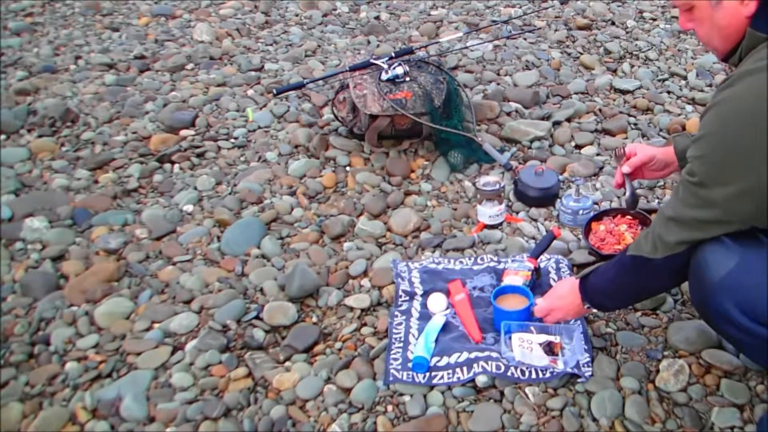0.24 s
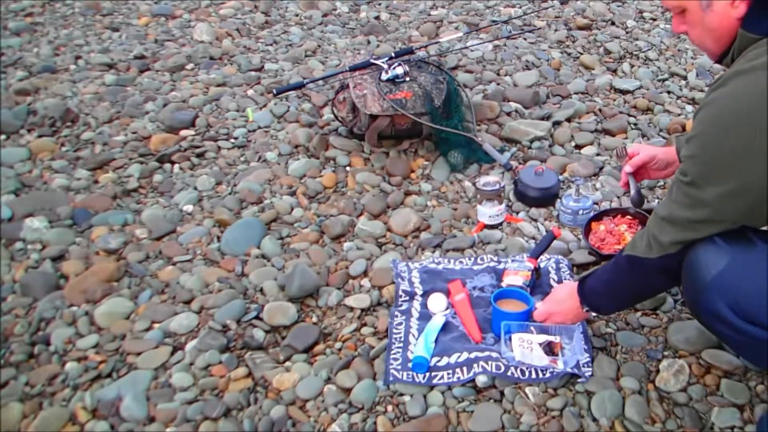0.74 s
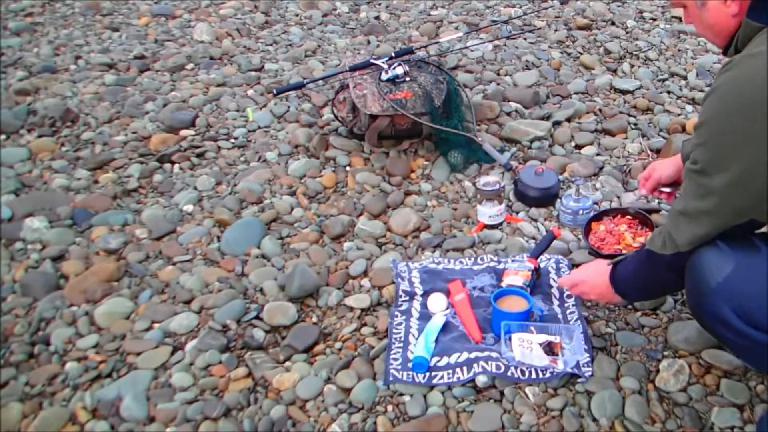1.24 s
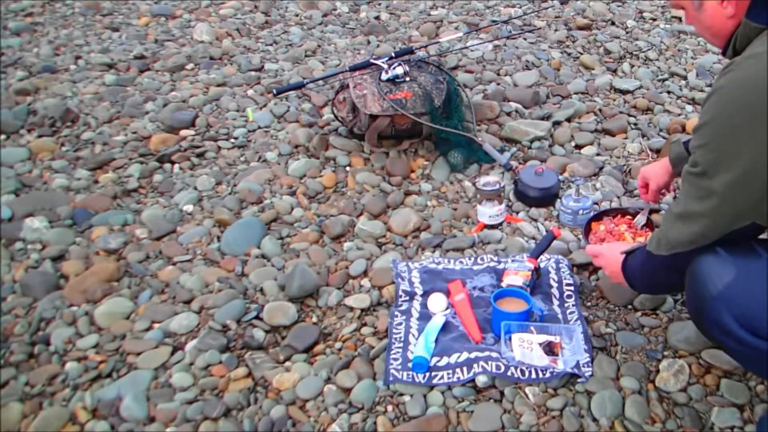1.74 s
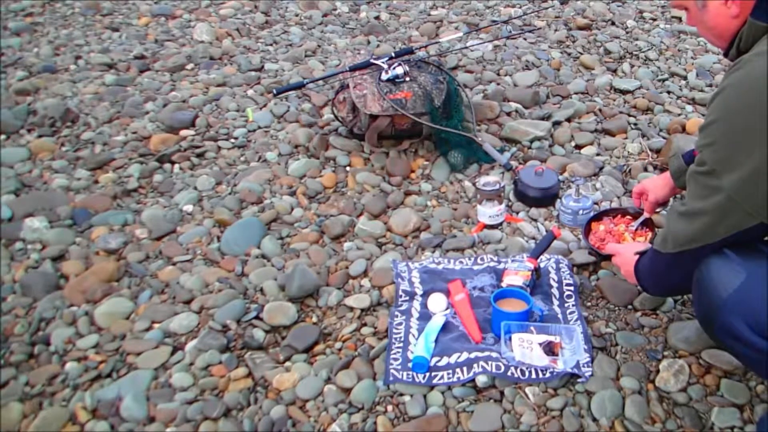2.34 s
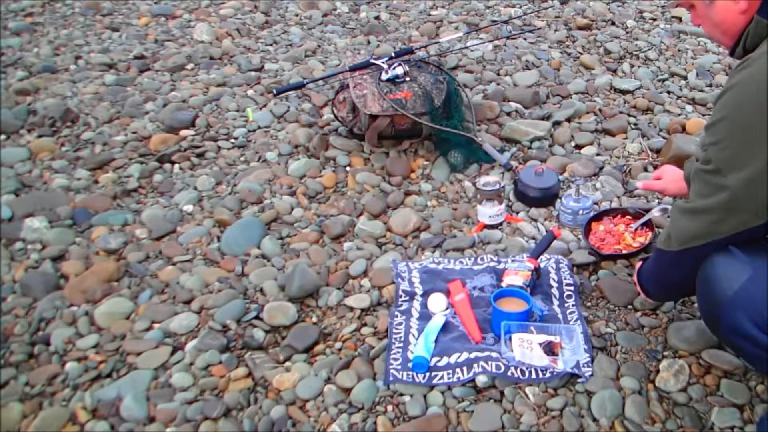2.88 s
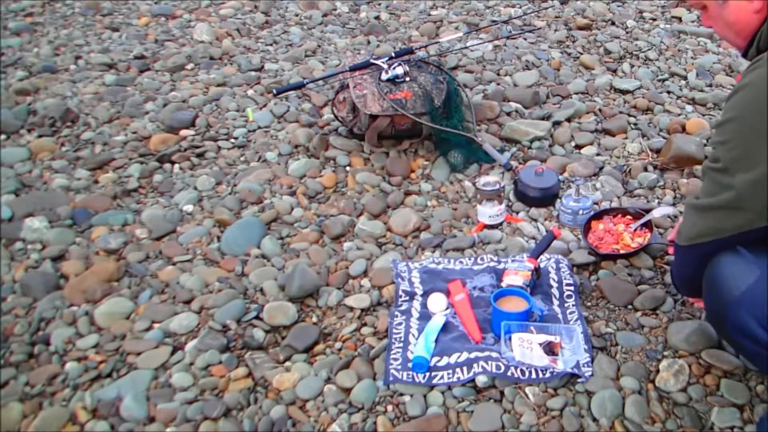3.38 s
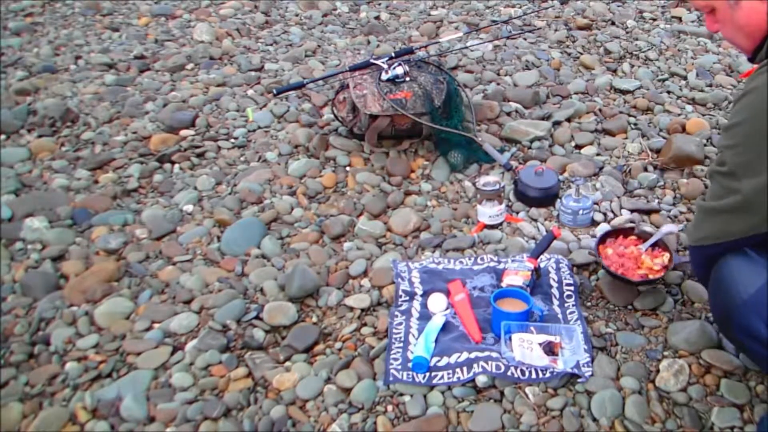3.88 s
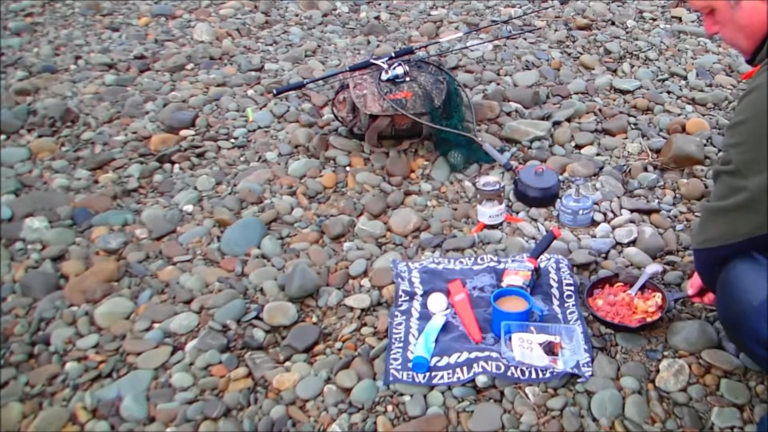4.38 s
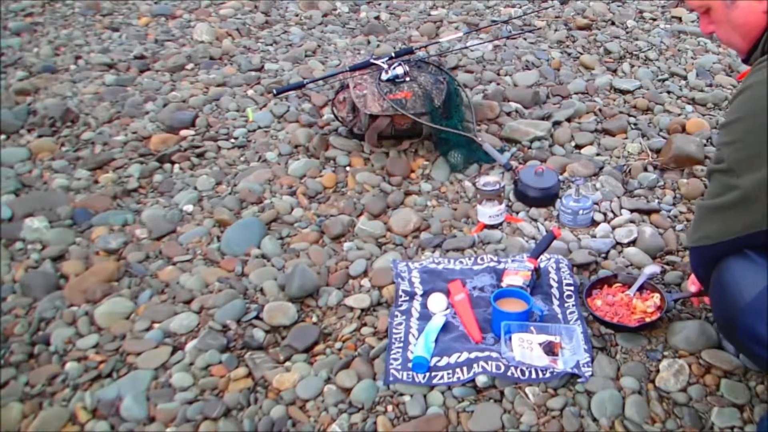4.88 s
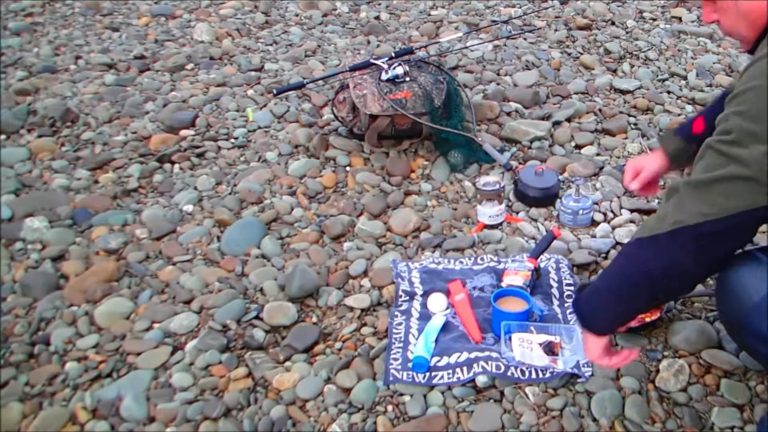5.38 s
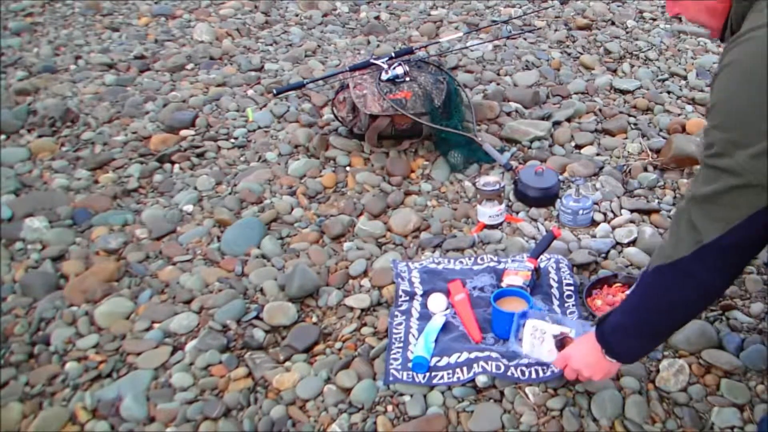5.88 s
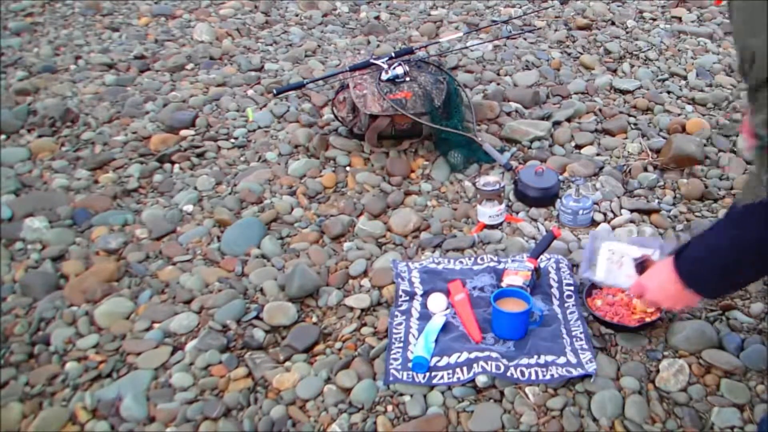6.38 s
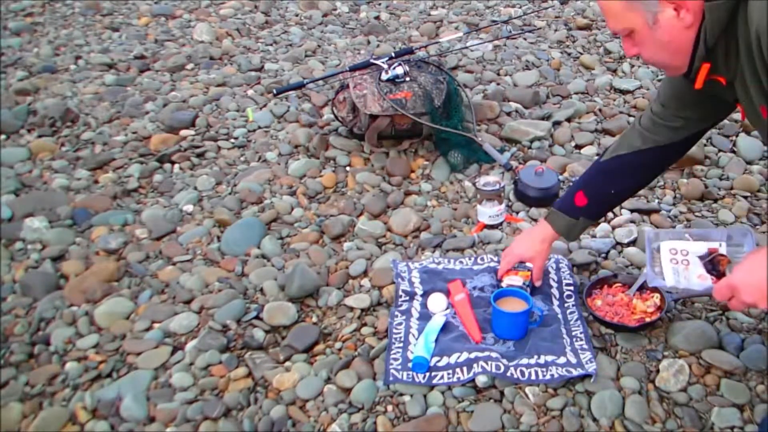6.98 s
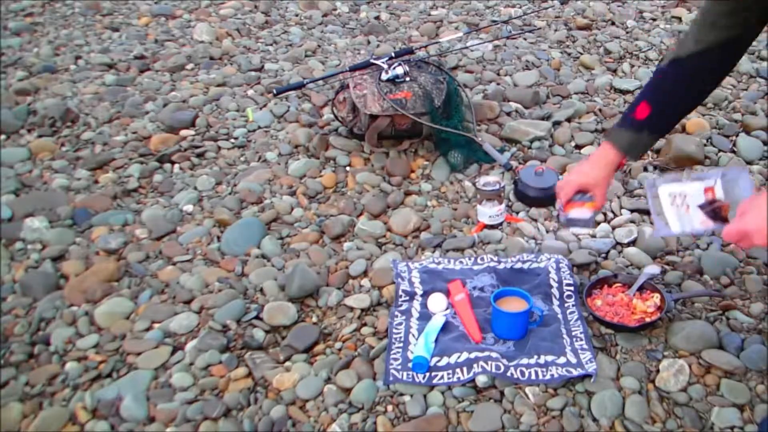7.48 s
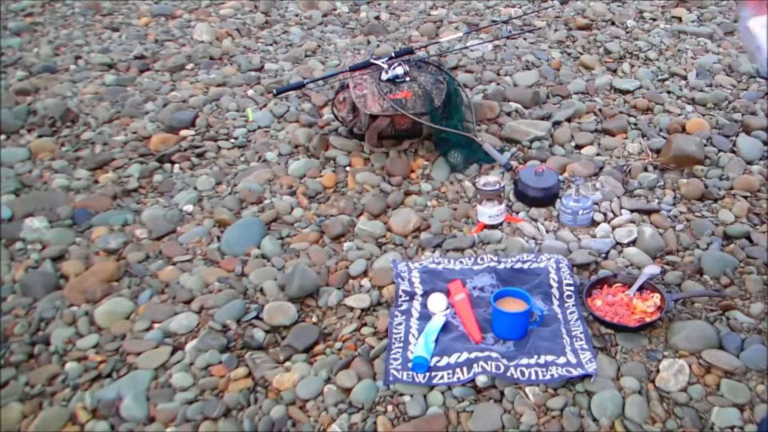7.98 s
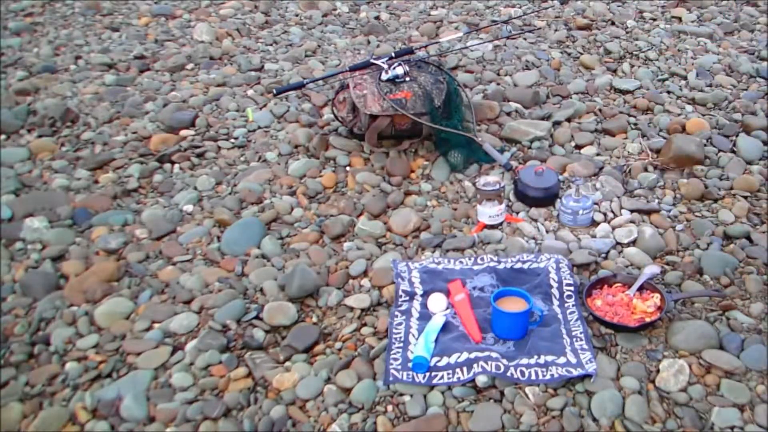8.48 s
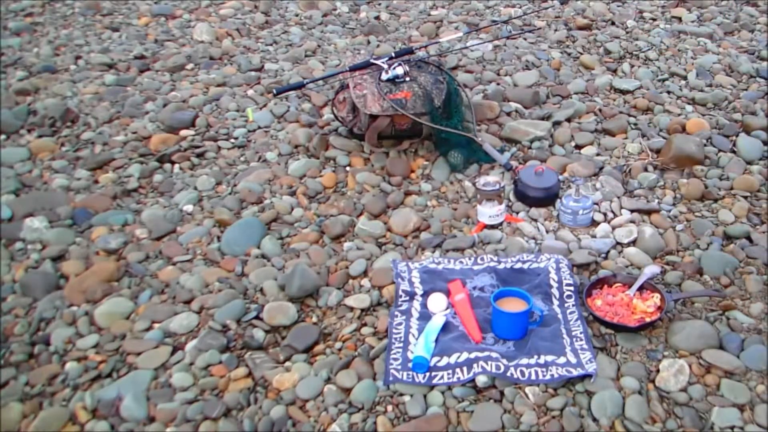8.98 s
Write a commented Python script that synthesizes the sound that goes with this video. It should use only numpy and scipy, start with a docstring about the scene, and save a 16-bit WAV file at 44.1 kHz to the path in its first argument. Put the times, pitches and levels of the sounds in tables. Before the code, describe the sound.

A far river rushes softly behind lively birdsong, heard in the open air through a small stereo microphone touched by light gusts. Two faint, quick spoon scrapes come from a small pan, which later clacks down on the stones. In the second half, clothing and a plastic bag crinkle and drag, joined by crisp pebble clicks that come thickest near the end, as the birds thin out.

```python
"""Camp meal by a river

Birds warble, chip and rasp over the far rush of water: sine glides and chopped noise, echoed off
stones and trees. A spoon scrapes a small pan; the pan is set down on stones; both ring its modes.
Sleeves and a plastic bag rustle in dense creases, pebbles click underfoot. Light wind puffs on
a small stereo microphone whose housing rings near 5 kHz."""
import sys
import numpy as np
from scipy import signal
from scipy.io import wavfile

SR = 44100
rng = np.random.default_rng(int(sys.argv[2]) if len(sys.argv) > 2 else 0)


def unload_audio(sound):
    """Save the sound as a 16-bit wav file, at the path given as the first command line argument."""
    columns = np.transpose(np.atleast_2d(sound))
    # keep every value between -1 and 1, then stretch to whole-number steps
    steps = np.round(np.clip(columns, -1, 1) * 32767)
    wavfile.write(sys.argv[1], SR, steps.astype(np.int16))


N = 407484
T = np.arange(N) / SR

# Table levels are relative: ahead of each source's gain and the microphone.
# river (frequency [Hz], density [dB])
RIVER_SPECTRUM = [(30, -42), (60, -16), (125, -3.5), (500, 4.5), (1000, -0.5), (2000, -5), (3300, -4.5),
                  (5300, -29), (8000, -4.5), (16000, -72)]
# river (frequency [Hz], left-right correlation [0-1])
RIVER_CORRELATION = [(60, 0.97), (300, 0.33), (5000, 0.42)]
# breeze (time [s], level [dB])
BREEZE_LEVEL = [(0, -75), (1.4, -73.5), (1.7, -64.5), (3.2, -66.5), (4, -75.5), (4.7, -63.5), (5.7, -67),
                (7.2, -78)]
# wind puffs (time [s], level [dB])
WIND_PUFFS = [(1.634, -29.5), (1.672, -30.5), (1.702, -39), (2.726, -35.5), (2.802, -39), (2.911, -40),
              (3.109, -38.5), (3.175, -34), (4.64, -34)]
# distant flock (time [s], level [dB])
TWITTER_LEVEL = [(0, -54), (.7, -55.5), (1.2, -55), (1.45, -108), (2.15, -54.5), (3.3, -56), (3.55, -67),
                 (3.9, -58), (4.8, -67.5), (5.3, -51), (5.7, -65)]
# thin swoops that drop and level out (time [s], start [Hz], level [dB])
BIRD_SWOOPS = [(0.208, 5090, -50.5), (0.368, 3620, -54), (.99, 5300, -55), (1.13, 4700, -58),
               (1.19, 4760, -53), (3.825, 5100, -54), (4.04, 4930, -59.5), (5.33, 4750, -54.5),
               (5.278, 5370, -61), (5.475, 5000, -50.5)]
# warbles (time [s], glide in [s], glide out [s], start [Hz], turn [Hz], end [Hz], level [dB])
BIRD_WARBLES = [(.255, 0.044, 0.23, 4760, 3880, 3500, -51), (.52, 0.033, 0.06, 3440, 3640, 2830, -50.5),
                (.76, 0.038, 0.031, 3310, 3760, 3480, -47), (.825, 0.028, 0.073, 3650, 2320, 3580, -54.5),
                (1.02, 0.044, 0.038, 4250, 3500, 2870, -46.5), (1.085, 0.022, 0.092, 3070, 2360, 3220, -50),
                (1.72, 0.036, 0.077, 4130, 3280, 2570, -54), (1.915, 0.038, 0.026, 3490, 3870, 2620, -43.5),
                (2.01, 0.067, 0.015, 2450, 3370, 2460, -47.5),
                (2.21, 0.026, 0.015, 4040, 3480, 3000, -44.5),
                (2.243, 0.03, 0.052, 3230, 2374, 2650, -48.5), (2.46, 0.09, 0.15, 4020, 4127, 3670, -49),
                (3.03, 0.014, 0.041, 3380, 3580, 2500, -53.5), (4.93, 0.08, 0.093, 2500, 3407, 2330, -48.5),
                (5.603, 0.037, 0.078, 2040, 2530, 2150, -48), (5.69, 0.057, .14, 3950, 4000, 3800, -56),
                (5.688, 0.047, 0.11, 2920, 3160, 2010, -50.5),
                (5.855, 0.03, 0.095, 2880, 3500, 2320, -47.5), (6.14, 0.017, 0.07, 3060, 3260, 2450, -46.5),
                (6.715, 0.022, 0.037, 2170, 2370, 2360, -45.5),
                (6.746, 0.051, 0.0046, 2265, 3990, 4100, -40.5),
                (7.036, 0.014, 0.056, 2630, 2660, 2550, -58), (8.62, 0.038, 0.11, 3420, 3940, 4300, -52.5)]
# high held whistles (time [s], length [s], pitch [Hz], level [dB])
BIRD_WHISTLES = [(0.475, .205, 6030, -48.5), (2.633, 0.19, 5950, -51)]
# falling chips of a second bird (time [s], level [dB])
BIRD_CHIPS = [(0.7425, -28.5), (0.796, -33), (0.829, -27.5), (1.334, -32.5), (2.434, -30.5), (2.623, -29),
              (2.899, -26.5), (3.002, -30), (3.075, -27.5), (3.229, -27), (4.912, -34), (6.954, -31),
              (7.017, -29)]
# quick drops (time [s], fall [s], start [Hz], level [dB])
BIRD_FALLS = [(0.909, 0.026, 3370, -53.5), (1.209, 0.02, 3070, -46.5), (2.339, 0.05, 3050, -50.5)]
# hoarse notes (time [s], length [s], level [dB])
BIRD_RASPS = [(2.347, 0.046, -55), (3.998, 0.019, -52.5), (4.495, 0.06, -64.5), (6.818, 0.031, -48)]
# pips (time [s], level [dB])
BIRD_PIPS = [(2.785, -48), (2.828, -49.5), (2.96, -47), (3.0, -48), (3.145, -48)]
# clucks (time [s], turn [Hz], level [dB])
BIRD_CLUCKS = [(5.098, 2050, -49.5), (5.328, 2276, -46.5), (5.56, 2210, -46.5), (5.812, 2046, -48),
               (6.478, 2210, -56), (7.516, 2730, -42), (7.94, 2720, -48.5), (8.383, 2660, -51)]
# spoon on pan (time [s], level [dB], contact [s])
SPOON_SCRAPES = [(1.618, -41, 0.026), (2.662, -43, 0.0061)]
# pan modes (frequency [Hz], level [dB], T60 [s])
PAN_MODES = [(940, -12, 0.025), (1600, -7, 0.03), (2680, -7, 0.016), (3560, -12, 0.04), (4600, -2, 0.015),
             (5200, 0, 0.022), (5850, 2, 0.011)]
# pan on stones (time [s], level [dB], crack offset [dB], ring tilt [dB/octave])
PAN_KNOCKS = [(4.3303, -12.5, -12.5, 5), (4.3737, -23, 2.5, -10.5)]
# sleeves and bag (time [s], level [dB])
RUSTLE_LEVEL = [(5.35, -69), (5.48, -56.5), (6.15, -52.5), (6.45, -58), (6.7, -49.5), (6.93, -53.5),
                (7.0, -62.5), (7.12, -50.5), (7.38, -44.5), (7.7, -47.5), (7.95, -54.5), (8.28, -46.5),
                (8.5, -53.5), (9.1, -53.5), (9.125, -83)]
# sleeves and bag (frequency [Hz], density [dB])
RUSTLE_SPECTRUM = [(100, -10), (400, 2.5), (3300, 2), (5300, 0.5), (7000, -2.5), (11500, 5.5), (16000, 7)]
# bag drags (time [s], length [s], level [dB])
BAG_DRAGS = [(6.212, 0.14, -46.5), (7.732, 0.18, -43), (8.01, 0.11, -40), (8.332, 0.073, -46.5),
             (8.529, 0.07, -52.5), (9.088, 0.036, -43)]
# pebbles and bag creases (time [s], level [dB], dull part offset [dB])
CONTACT_CLICKS = [(6.745, -30, 0), (6.88, -22.5, -27), (7.519, -37, 20), (7.7564, -35.5, 19),
                  (7.794, -19.5, -26), (8.0192, -21, -1), (8.097, -17, -30), (8.2478, -22.5, -25),
                  (8.335, -18, -30), (8.4389, -11.5, -43), (8.447, -15, -2.5), (8.537, -19, -31),
                  (8.8, -8, -27), (8.8174, -27, -21), (8.8528, -31, -25), (8.893, -26.5, -24),
                  (9.1065, -24, -8)]

# call shapes (glide in [s], glide out [s], start/turn pitch [ratio], end/turn pitch [ratio])
PIP_SHAPE = (0.01, 0.018, 0.83, 0.88)
CLUCK_SHAPE = (0.01556, 0.0398, 0.8, 0.61)


def from_db(db):
    """Decibels to gain."""
    return 10 ** (np.asarray(db) / 20)


def unit_rms(x):
    """Scale to rms 1."""
    return x / np.sqrt(np.mean(x ** 2) + 1e-20)


def envelope(rows):
    """Gain curve from (time [s], level [dB])."""
    return from_db(np.interp(T, *np.transpose(rows)))


def at_hz(points, hz):
    """Interpolate over log frequency."""
    points_hz, values = np.transpose(points)
    return np.interp(np.log(hz), np.log(points_hz), values)


def band(x, low_hz, high_hz):
    """Butterworth band-pass."""
    return signal.sosfilt(signal.butter(2, [low_hz, high_hz], "band", fs=SR, output="sos"), x + 1e-18)


def drift(corner_hz):
    """Slow noise, rms 1."""
    hop = 40
    r = np.exp(-2 * np.pi * corner_hz * hop / SR)
    slow = signal.lfilter([1], [1, -2 * r, r * r], rng.standard_normal(N // hop + 2002))[2000:]
    return np.interp(np.arange(N) / hop, np.arange(len(slow)), unit_rms(slow))


def poles(hz, width_hz):
    """Two-pole polynomial of a resonance."""
    r = np.exp(-np.pi * width_hz / SR)
    return np.array([1, -2 * r * np.cos(2 * np.pi * hz / SR), r * r])


def ring(x, numerator, hz, t60_s):
    """Drive one damped mode."""
    return signal.lfilter(numerator, poles(hz, np.log(1000) / np.pi / t60_s), x + 1e-18)


def decay(x, tau_s):
    """Exponential tail on each impulse."""
    return signal.lfilter([1], [1, -np.exp(-1 / (tau_s * SR))], x)


def impulses(times_s, gains):
    """Click train."""
    out = np.zeros(N)
    out[np.round(times_s * SR).astype(int)] = gains
    return out


def shaped_stereo(pairs, spectrum, correlation, flicker_db):
    """Flickering half-octave bands, taken in turn from two (mid, side) pairs; rms 1."""
    out, edges_hz = 0, 30 * 2 ** np.arange(0, 9.4, .5)
    for k, (low_hz, high_hz) in enumerate(zip(edges_hz, edges_hz[1:])):
        mid, side = band(pairs[k % 2], low_hz, high_hz)
        hz = np.sqrt(low_hz * high_hz)
        alike = at_hz(correlation, hz)
        stereo = np.sqrt(1 + alike) * mid + np.sqrt(1 - alike) * side * [[1], [-1]]
        gain = from_db(at_hz(spectrum, hz) + flicker_db * drift(14))
        out = out + (-1) ** k * gain * stereo   # signs join the band edges
    return unit_rms(out)


def sine(hz, gain):
    """Sine along a pitch curve."""
    return gain * np.sin(2 * np.pi * np.cumsum(hz) / SR + rng.uniform(0, 2 * np.pi))


def add_glide(out, time_s, length_s, hz, octaves, db):
    """Add a short sweep centred on hz."""
    along = np.linspace(0, 1, int(length_s * SR))
    start = int(time_s * SR)
    pitch_hz = hz * 2 ** (octaves * (along - .5))
    out[start:start + len(along)] += sine(pitch_hz, from_db(db) * np.sin(np.pi * along))


def river(gain_db=-52.5):
    """Far water: broad noise, nearly mono in the bass."""
    white = rng.standard_normal((2, 2, N))
    return from_db(gain_db) * shaped_stereo(white, RIVER_SPECTRUM, RIVER_CORRELATION, flicker_db=1.5)


def wind(puff_gain_db=44, right_db=-6):
    """Separate low noise on each port; pressure puffs mostly on the left."""
    time_s, db = np.transpose(WIND_PUFFS)
    puffs = band(band(impulses(time_s, from_db(db + puff_gain_db)), 93, 230), 50, 234)
    rumble = unit_rms(band(rng.standard_normal((2, N)), 53, 152))
    breeze = envelope(BREEZE_LEVEL) * rumble * from_db([[3], [-3]])
    return breeze + np.array([puffs, from_db(right_db) * np.roll(puffs, 60)])


def twitter(count=2400, span_s=9.1, gain_db=-6):
    """Distant flock: random short glides, the higher ones softer."""
    flock = np.zeros(N)
    for when, octave, bend, length, loud in rng.random((count, 5)):
        add_glide(flock, when * span_s, length_s=.007 + .02 * length ** 2, hz=3000 * 2 ** octave,
                  octaves=.05 - .4 * bend, db=5 * loud - 14 * octave)
    return from_db(gain_db) * envelope(TWITTER_LEVEL) * unit_rms(flock * from_db(3 * drift(150)))


def note_contour(time_s, in_s, out_s, start_hz, turn_hz, end_hz, db, ends_db=-6):
    """Time, pitch and level of a note: flat and loudest at its turn."""
    t = T[int(time_s * SR):int((time_s + in_s + out_s) * SR)] - time_s
    away = np.where(t < in_s, 1 - t / in_s, (t - in_s) / out_s)
    reach_hz = np.where(t < in_s, start_hz, end_hz) - turn_hz
    return t, turn_hz + reach_hz * away ** 2.2, db + ends_db * away


def held_contour(length_s, hz, db, hook_s=0.017, hook_hz=486, ends_db=-6):
    """Time, pitch and level of a whistle hooked down at both ends."""
    t = T[:int(length_s * SR)]
    hooks = np.exp(-t / hook_s) + np.exp(-2 * (length_s - t) / hook_s)
    return t, hz - hook_hz * hooks, db + ends_db * hooks


def birdsong(swoop_s=0.049, swoop_ratio=.72, fall_ratio=.78, flat_s=0.0055, pip_hz=3630, fade_s=.011):
    """Sine notes that waver in pitch and flutter in level."""
    calls = [(CLUCK_SHAPE, *row) for row in BIRD_CLUCKS]
    calls += [(PIP_SHAPE, s, pip_hz, db) for s, db in BIRD_PIPS]
    notes = list(BIRD_WARBLES)
    notes += [(s, in_s, out_s, start * hz, hz, end * hz, db)
              for (in_s, out_s, start, end), s, hz, db in calls]
    notes += [(s, flat_s, fall_s, hz, hz, fall_ratio * hz, db) for s, fall_s, hz, db in BIRD_FALLS]
    notes += [(s, swoop_s, flat_s, hz, swoop_ratio * hz, swoop_ratio * hz, db)
              for s, hz, db in BIRD_SWOOPS]
    contours = [(row[0], note_contour(*row)) for row in notes]
    contours += [(s, held_contour(*rest)) for s, *rest in BIRD_WHISTLES]
    waver = 1 + .007 * drift(90)
    flutter = from_db(2.5 * drift(90) + 3 * drift(22))
    out = np.zeros(N)
    for time_s, (t, hz, db) in contours:
        part = slice(int(time_s * SR), int(time_s * SR) + len(t))
        fade = np.clip(np.minimum(t, t[-1] - t) / fade_s, 0, 1)
        treble_loss_db = 24 * np.log2(np.maximum(hz / 4470, 1))
        gain = np.sqrt(2) * fade * from_db(db - treble_loss_db) * flutter[part]
        out[part] += sine(hz * waver[part], gain)
    return out


def chips(gain_db=-22):
    """Second bird: brief falling treble sweeps."""
    out = np.zeros(N)
    for time_s, db in BIRD_CHIPS:
        add_glide(out, time_s, length_s=0.0107, hz=5400, octaves=-.34, db=db + gain_db)
    return out


def far_echo(x, echo_db=-2, t60_s=0.45):
    """Scatter off stones and trees: one dying noise tail per side."""
    t = T[:int(t60_s * SR)]
    tails = unit_rms(rng.standard_normal((2, len(t))) * from_db(-60 * t / t60_s)) / np.sqrt(len(t))
    return x + from_db(echo_db) * signal.fftconvolve(x[None], tails, axes=1)[:, :N]


def pan_mode(force, hz, db, t60_s, gain_db=-16):
    """One mode of the pan under a contact force."""
    return from_db(db + gain_db) * ring(force, [.5, 0, -.5], hz, t60_s)


def spoon_scrapes(roughness, gain_db=-16, ring_db=-10):
    """Friction bursts hiss and ring both spoon and pan."""
    pressure = np.zeros(N)
    for time_s, db, contact_s in SPOON_SCRAPES:
        release = np.clip(1.5 - 1.56 * (T - time_s) / contact_s, 0, 1)
        pressure += from_db(db + gain_db) * (T > time_s) * release
    friction = roughness * pressure
    hiss = 13.5 * signal.lfilter([1, -1], [1], friction)
    spoon = ring(friction, [from_db(ring_db)], hz=6290, t60_s=0.057)
    return hiss + spoon + sum(pan_mode(friction, *mode) for mode in PAN_MODES)


def rasps(throb_hz=260, band_hz=(4900, 6100)):
    """Hoarse bird notes: noise chopped by a fast throb."""
    swells = sum(from_db(db) * np.sin(np.pi * np.clip((T - time_s) / length_s, 0, 1))
                 for time_s, length_s, db in BIRD_RASPS)
    throb = np.sin(np.pi * throb_hz * T + drift(40)) ** 2
    return swells * unit_rms(band(throb * rng.standard_normal(N), *band_hz))


def pan_knocks(roughness, edge_db=-9, pivot_hz=4440):
    """Pan meets stones: dull crack, bright edge, modes rung by the blow and the chattering base."""
    time_s, db, crack_db, tilt_db = np.transpose(PAN_KNOCKS)
    contacts = impulses(time_s, from_db(db + crack_db))
    crack = roughness * decay(contacts, tau_s=0.0022)
    out = band(24 * contacts + 3.1 * crack, 900, 3000)
    out += from_db(edge_db) * band(crack, 9600, 20000)
    for hz, mode_db, t60_s in PAN_MODES:
        blows = impulses(time_s, from_db(db + tilt_db * np.log2(hz / pivot_hz)))
        chatter = .14 * roughness * decay(blows, tau_s=.003)
        out += pan_mode(blows + chatter, hz, mode_db, t60_s)
    return out


def handling(swell_share=0.082, stop_share=0.42):
    """Rustle envelope: steady movement plus bag drags that swell, hold and stop."""
    power = (envelope(RUSTLE_LEVEL) * (T > RUSTLE_LEVEL[0][0])) ** 2
    for time_s, length_s, db in BAG_DRAGS:
        along = (T - time_s) / length_s
        drag = np.clip(np.minimum(along / swell_share, (1 - along) / stop_share), 0, 1)
        power += (from_db(db) * drag) ** 2
    return np.sqrt(power)


def rustle(base_rate_hz=2500, spread_db=2.3, gain_db=4.5):
    """Cloth and film crease in dense, uneven clumps."""
    sizes = from_db(spread_db * np.minimum(rng.exponential(1, N), 5)) * rng.choice([-1, 1], N)
    fires = rng.random(N) < base_rate_hz * from_db(3 * drift(30)) / SR
    creases = unit_rms(sizes * fires)
    pairs = [np.array([creases, side]) for side in rng.standard_normal((2, N))]
    correlation = [(500, 0.77), (5000, 0.68), (12000, 0.016)]
    cloth = shaped_stereo(pairs, RUSTLE_SPECTRUM, correlation, flicker_db=.7)
    return from_db(gain_db) * handling() * cloth


def clicks(tick_gain_db=9.5, dull_gain_db=10, scatter_db=-34):
    """Pebble and crease contacts: bright tick, sharp snap, dull part, faint scatter off stones."""
    time_s, db, dull_db = np.transpose(CONTACT_CLICKS)
    ticks = impulses(time_s, from_db(db + tick_gain_db))
    scatter = from_db(scatter_db) * decay(ticks, tau_s=.005) * rng.standard_normal(N)
    bright = band(ticks + scatter, 3300, 9400)
    snap = 0.55 * band(ticks + 4.1 * scatter, 6600, 13600)
    dull = band(impulses(time_s, from_db(db + dull_db + dull_gain_db)), 650, 2500)
    return bright + snap + dull


def scene(left_bias_db=3):
    """All sources at the two ports."""
    water = river()
    birds = far_echo(birdsong() + chips() + twitter() + rasps())
    roughness = rng.standard_normal(N)
    air = water + birds + spoon_scrapes(roughness) + pan_knocks(roughness) + clicks() + rustle()
    return air * from_db([[left_bias_db / 2], [-left_bias_db / 2]]) + wind()


def record(dry, stopband_hz=16400):
    """Microphone: housing and port add a notch and two peaks, capsules hiss, the top is cut."""
    notch = poles(hz=4060, width_hz=400)
    housing = poles(hz=4440, width_hz=1326)
    port = poles(hz=5333, width_hz=1020)
    housed = signal.lfilter(notch * housing.sum() / notch.sum(), housing, dry)
    ported = signal.lfilter([port.sum()], port, housed)
    hiss = from_db(-56) * unit_rms(band(rng.standard_normal((2, N)), 2300, 21400))
    return signal.sosfilt(signal.cheby2(12, 70, stopband_hz, fs=SR, output="sos"), ported + hiss)


dry = scene()
out = record(dry)
unload_audio(out)
```